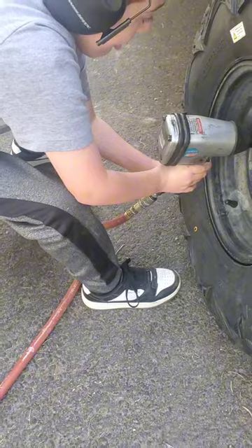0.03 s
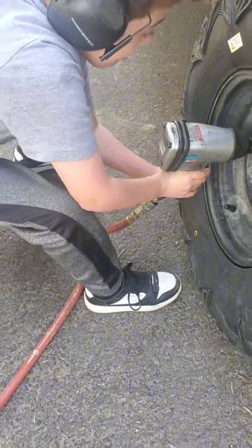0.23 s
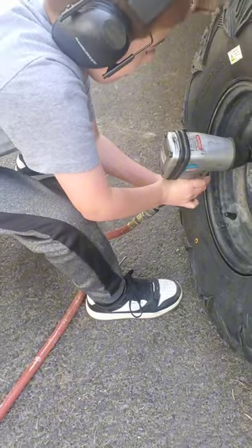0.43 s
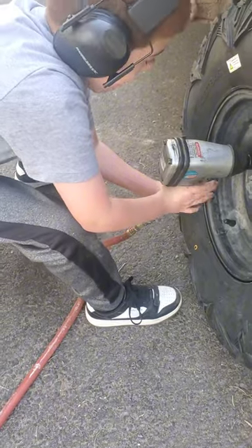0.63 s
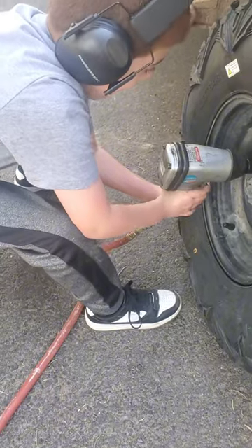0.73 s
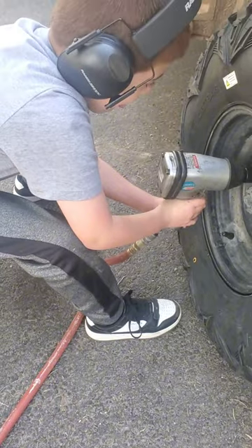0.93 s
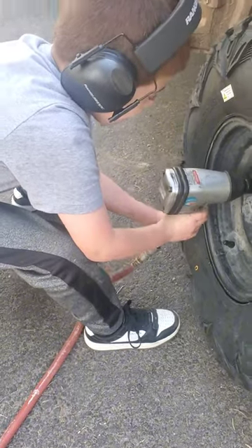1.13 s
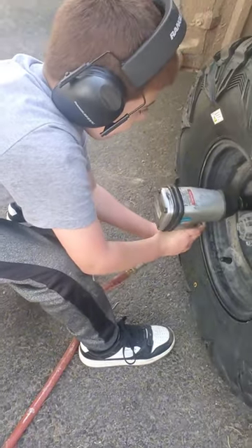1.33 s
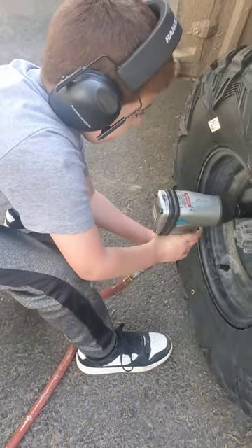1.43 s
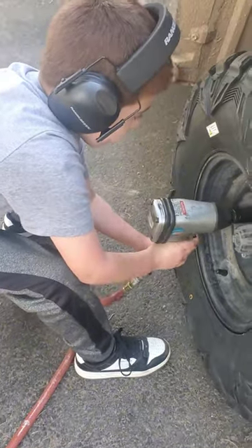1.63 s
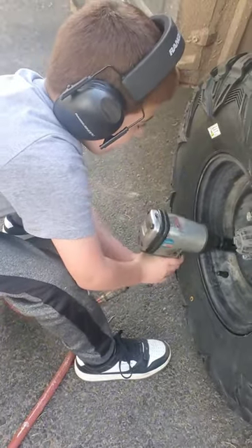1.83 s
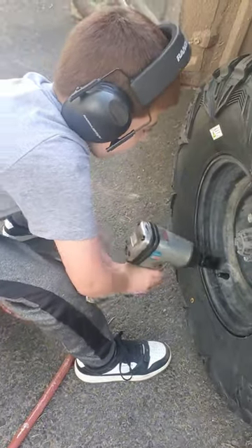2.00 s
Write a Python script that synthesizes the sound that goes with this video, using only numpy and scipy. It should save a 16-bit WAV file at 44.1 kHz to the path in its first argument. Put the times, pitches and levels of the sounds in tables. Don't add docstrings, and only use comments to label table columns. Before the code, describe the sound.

An air impact wrench fires one short rattling burst on a wheel nut, then clicks off

```python
import sys
import numpy as np
from scipy import signal
from scipy.fft import rfft, irfft, next_fast_len
from scipy.io import wavfile
from scipy.ndimage import uniform_filter1d, map_coordinates

SR = 44100
rng = np.random.default_rng(int(sys.argv[2]) if len(sys.argv) > 2 else 0)


def natural_amplitude(level_db):
    exponent = np.asarray(level_db, float) / 20
    return 10 ** exponent


def store_pcm(level_fs):
    pcm = np.round(np.clip(level_fs, -1, 1) * 32767).astype(np.int16)
    wavfile.write(sys.argv[1], SR, np.atleast_2d(pcm).T)


N = 90978
T = np.arange(N) / SR
STRIKE_T = np.arange(SR // 5) / SR


def unit(x):
    return x / np.sqrt(np.mean(x ** 2) + 1e-20)


def along(points, hz):
    f, v = np.transpose(points)
    return np.interp(np.log(hz + 1), np.log(f + 1), v)


def curves(rows):
    s, *cols = np.transpose(rows)
    return [np.interp(T, s, c) for c in cols]


def wobble(rate):
    return map_coordinates(rng.standard_normal(2000), [T * rate])


def filtered(x, response):
    m = next_fast_len(N + SR // 2)
    return irfft(rfft(x, m) * response(np.fft.rfftfreq(m, 1 / SR)), m)[..., :N]


def low_cut(x, corner_hz):
    return filtered(x, lambda f: (1j * f / (corner_hz + 1j * f)) ** 2)


def shape(table):
    return lambda f: natural_amplitude(along(table, f))


def peak(f, center_hz, width_hz):
    return 1 / (1 + (2 * (f - center_hz) / width_hz) ** 2)


def bump(start_s, half_s):
    return np.exp(-.5 * ((T - start_s) / half_s) ** 2)


def window(start, end, rise, fall):
    return (1 + np.tanh((T - start) / rise)) * (1 + np.tanh((end - T) / fall)) / 4


def rush(colour, alike, patchy_db):
    z = signal.stft(rng.standard_normal((2, N)), nperseg=256)[2]
    field = uniform_filter1d(rng.standard_normal(z.shape[1:]), size=5, axis=0)
    field = uniform_filter1d(field, size=6, axis=1)
    pair = signal.istft(z * natural_amplitude(patchy_db * unit(field)), nperseg=256)[1][:, :N]

    def spread(hz):
        angle = np.arccos(np.clip(along(alike, hz), -1, 1)) / 2
        return np.array([np.cos(angle), np.sin(angle)])

    mid, side = filtered(pair, spread)
    return unit(filtered(np.array([mid + side, mid - side]), colour))


def blips(rows, half_s):
    out = np.zeros((2, N))
    for s, db, hz in rows:
        phase = 2 * np.pi * rng.random()
        apart = (rng.random() - .5) * np.array([[1], [-1]])
        out += natural_amplitude(db) * bump(s, half_s) * np.sin(2 * np.pi * hz * T + phase + apart)
    return out


def place(out, start_s, sound):
    out[:, round(start_s * SR):][:, :len(STRIKE_T)] += sound


# start_s, vane_rate_hz, air_flow_db
SPEED = [
    (1.03, 201, -27.5),
    (1.075, 288, -24),
    (1.103, 305, -17.5),
    (1.13, 395, -17.5),
    (1.167, 466, -16),
    (1.19, 402, -16.5),
    (1.225, 370, -17),
    (1.26, 386, -17),
    (1.34, 378, -18),
]


def wrench():
    rate_hz, flow_db = curves(SPEED)
    turns = np.cumsum(rate_hz * (1 + .022 * wobble(rate=110))) / SR
    flow = natural_amplitude(flow_db) * window(1.026, 1.3305, .004, .004)
    singing = np.sqrt(2) * vane_tones(rate_hz, turns) * window(1.068, 1.327, .008, 0.033)
    rattle_db = -17.5 + 5 * window(1.17, 3, .03, 0.6)
    return exhaust(turns, flow) + flow * (singing + natural_amplitude(rattle_db) * rattle())


# start_s, level_db, half_width_s
PUFFS = [
    (1.002, -48, 0.0026),
    (1.009, -30.5, 0.0016),
    (1.017, -15, 0.0047),
    (1.021, -17.5, 0.0029),
    (1.04, -14.5, 0.0018),
    (1.05, -24, .002),
    (1.056, -29, 0.0022),
    (1.065, -17, 0.002),
    (1.078, -27.5, 0.0029),
    (1.089, -22, 0.0025),
]
# pitch_hz, level_db (per Hz)
JET = [(150, -18.5), (500, -11.5), (2500, -15.5), (5000, -10.5), (8200, -12.5), (11000, -9.5),
       (15500, -10.5), (16100, -47)]
# pitch_hz, width_hz, level_db
PORTS = [(1980, 200, -0.5), (2600, 180, -3.5), (3500, 480, -2), (4560, 250, -9.5), (5980, 1000, 1.5),
         (11700, 250, 1), (12300, 230, -2.5), (13100, 770, -3.5)]
# pitch_hz, likeness (0 to 1)
ALIKE = [(60, 0.61), (180, 0.9), (550, 1), (1650, 1), (4970, 0.77), (15000, 0.1)]


def exhaust(turns, flow):
    def ports(f):
        ringing = sum(natural_amplitude(db) * peak(f, center, width) for center, width, db in PORTS)
        return natural_amplitude(along(JET, f)) * (1 + natural_amplitude(2) * ringing)

    def bright(f):
        valve_seat = 1 + natural_amplitude(-1.5) * peak(f, 2300, 1100)
        return ports(f) * natural_amplitude(7.5 * np.log10(f + 1)) * valve_seat

    pops = sum(natural_amplitude(db) * bump(s, half_s) for s, db, half_s in PUFFS)
    chop = (1 + .33 * np.cos(2 * np.pi * turns)) * natural_amplitude(.6 * wobble(60))
    return rush(ports, ALIKE, 1.5) * flow * chop + rush(bright, ALIKE, 1.5) * pops


# multiple (of the rate), level_db (over the air flow)
VANES = [(1, -14), (2, -16.5), (2.5, -30.5), (3, -34.5), (3.5, -26.5), (5, -26)]
# pitch_hz, level_db
PIPE = [(250, -31.5), (305, -14), (335, -1), (400, 0), (470, 1), (600, 1), (1000, -2), (2500, 0)]
VANE_COUNT, VANE_WOBBLES_PER_S = 6, 70


def vane_tones(rate_hz, turns):
    out = 0
    for k, db in VANES:
        level = natural_amplitude(db + along(PIPE, k * rate_hz) + 1.8 * wobble(rate=VANE_WOBBLES_PER_S))
        rough = 1 + .35 * wobble(rate=4 * VANE_WOBBLES_PER_S)
        uneven = 1 + .75 * (k > 1) * np.cos(2 * np.pi * turns / VANE_COUNT)
        out = out + level * rough * uneven * np.sin(2 * np.pi * k * turns)
    return out


def rattle():
    hits_per_s, ring_hz = 600, 2200
    chance, size = rng.random((2, N))
    strength = natural_amplitude(-3.5 * np.log(size + .03))
    hits = (chance < hits_per_s / SR) * strength * np.sign(chance * SR / hits_per_s - .5)

    def ring(f):
        return (1j * f * ring_hz * .6 / (ring_hz ** 2 - f * f + 1j * f * ring_hz * 0.96)) ** 2

    steel = unit(filtered(hits, ring))
    return steel + .5 * np.roll(steel, 9) * [[1], [-1]]


# start_s, level_db,
# pitch_hz
KNOCKS = [(1.012, -18.5, 2002), (1.017, -19.5, 2500), (1.023, -17.5, 2000), (1.106, -12, 11300),
          (1.152, -11.5, 12200), (1.157, -10.5, 12300), (1.187, -12.5, 12200), (1.089, -17, 2700),
          (1.098, -20, 2600), (1.11, -17.5, 1800), (1.112, -17, 2630), (1.152, -22.5, 2440),
          (1.181, -15, 1870), (1.202, -13.5, 3054), (1.209, -12.5, 1800), (1.21, -16.5, 2674),
          (1.228, -13, 1845), (1.229, -18, 1281), (1.245, -18.5, 1910), (1.289, -21.5, 2600),
          (1.299, -13.5, 1984), (1.308, -15.5, 2483), (1.324, -16, 2640), (1.288, -20, 4897),
          (1.297, -17, 4680), (1.253, -20, 4700), (1.329, -17, 4900)]
# start_s, level_db
CHIRPS = [(1.093, -17), (1.106, -17.5), (1.13, -17), (1.146, -17), (1.152, -16), (1.16, -16), (1.167, -15),
          (1.172, -10), (1.179, -10), (1.188, -14), (1.206, -14.5), (1.219, -17.5), (1.244, -17.5),
          (1.253, -18), (1.266, -16), (1.272, -17), (1.276, -14), (1.283, -13.5), (1.288, -11.5)]


def slaps():
    whistles = [(s, db, 6040 * rng.normal(1, .04)) for s, db in CHIRPS]
    return natural_amplitude(-1.5) * (blips(KNOCKS, half_s=.0011) + blips(whistles, half_s=0.00068))


DETUNE = .012


def modes(table):
    out = 0
    for hz, db, t60 in table:
        chatter_db = 3 * wobble(rate=200)[:len(STRIKE_T)]
        level = natural_amplitude(db + rng.normal(0, 1.5) + chatter_db - 60 * STRIKE_T / t60)
        out = out + level * np.sin(2 * np.pi * hz * rng.normal(1, DETUNE) * STRIKE_T)
    return out


# pitch_hz, level_db, t60_s
RIM = [(488, 7.5, .022), (747, 0.5, 0.051)]


def strike(db, ring_db, crack_db, rim_db, steel, blow_hz):
    t = STRIKE_T
    rim = natural_amplitude(rim_db + 10.5) * modes(RIM) * (1 - np.exp(-t / 0.0029)) ** 2
    ring = natural_amplitude(ring_db) * modes(steel) / 2 + rim
    blow = natural_amplitude(11.5 - 60 * t / 0.0091) * np.sin(2 * np.pi * blow_hz * rng.normal(1, DETUNE) * t)
    noise = rng.standard_normal(len(t)) + 0.23 * rng.standard_normal((2, len(t)))
    hiss = signal.lfilter([.5], [1, -1.1, .4], noise)
    fade = natural_amplitude(-60 * t / 0.023) + natural_amplitude(-27 - 60 * t / .3)
    crack = natural_amplitude(crack_db) * fade * np.diff(hiss, prepend=0)
    return natural_amplitude(db - 5) * (ring + blow + 2 * crack) * (1 - np.exp(-t / .0007))


# start_s, peak_db, ring_db, crack_db, rim_db
SNAP = (1.358, -20, 7, -1, -40)
# pitch_hz, level_db, t60_s
TRIGGER = [(446, 0, 0.071), (750, -8, 0.065), (1154, -6, .025), (1797, -4, 0.049), (2180, 6.5, .015),
           (3040, -7, 0.022), (3580, 0, 0.028), (4540, -5, 0.013), (6780, -18, .03)]
# start_s, peak_db, ring_db, crack_db, rim_db
CLICKS = [
    (1.9146, -34, 9, -11, -7),
    (2.0089, -16.5, 6.5, -16.5, -18.5),
    (2.0479, -27, 10, -17, -13.5),
]
# pitch_hz, level_db, t60_s
SOCKET = [(1180, -12, .03), (1960, 0, .016), (2540, -10, .035), (2760, -6, .022), (3225, -18, .035),
          (4100, -13, .026), (4550, -18, .03), (5250, -13, .022), (5800, -9, .022), (6891, -22, .05),
          (7569, -23, .03), (9400, -34, .05)]
# start_s, level_db, pitch_hz
TICKS = [(.003, -50, 4000), (.04, -56, 8800), (.087, -49, 5000), (.402, -57, 5000), (.68, -53, 2300),
         (.693, -54, 12000), (.845, -45, 2300), (1.833, -53, 2600), (1.832, -51, 1600), (1.84, -55, 800),
         (1.844, -53, 1700)]


def socket():
    out = np.zeros((2, N + SR))
    start_s, *levels = SNAP
    place(out, start_s, strike(*levels, TRIGGER, blow_hz=3100))
    for start_s, *levels in CLICKS:
        place(out, start_s, strike(*levels, SOCKET, blow_hz=2567))
    for start_s, db, hz in TICKS:
        band = signal.butter(2, [hz * .85, hz * 1.17], "band", fs=SR)
        grit = signal.lfilter(*band, rng.standard_normal((2, len(STRIKE_T))))
        place(out, start_s, natural_amplitude(db - 60 * STRIKE_T / 0.033) * grit)
    return low_cut(out[:, :N], 332.7)


# start_s, level_db, pitch_hz, t60_s
THUMPS = [
    (0.0, -37, 69, 0.12),
    (0.047, -44, 51.3, 0.16),
    (0.139, -50.5, 52.5, 0.31),
    (1.018, -34.5, 94.8, 0.13),
    (1.029, -36, 165, 0.18),
    (1.342, -35, 176.5, 0.17),
    (1.91, -62.5, 99, 0.34),
]


def thump():
    out = 0
    for s, db, hz, t60 in THUMPS:
        since = np.maximum(T - s, 0)
        out = out + natural_amplitude(db - 60 * since / t60) * np.sin(2 * np.pi * hz * since)
    return out


def echo(x, t60s):
    hz, t, z = signal.stft(rng.standard_normal((2, SR // 2)), SR, nperseg=128)
    side = z[1] * (hz / np.hypot(hz, 1800))[:, None]
    z = z[0] + side * [[[1]], [[-1]]]
    tail = signal.istft(z * natural_amplitude(-60 * t / along(t60s, hz)[:, None]), SR, nperseg=128)[1]
    return signal.fftconvolve(x, tail / np.linalg.norm(tail[0]), axes=1)[:, :N]


# start_s, level_db
GAIN = [(0, -56.5), (.1, -62), (.4, -60), (.43, -69), (.47, -61), (1.0, -58.5), (1.38, -42.5), (1.5, -74.5),
        (1.66, -79), (1.88, -76.5), (1.95, -66), (2.06, -60.5)]
# pitch_hz, level_db (per Hz)
MURMUR = [(59, -38), (100, -14.5), (315, -7), (818, -6.5), (1760, -18), (3400, -27.5), (7940, -45.5),
          (11900, -35.5), (16000, -49.5)]


def murmur():
    level_db, = curves(GAIN)
    alike = [(200, 1.0), (1000, 0.17), (8000, 0.093)]
    return natural_amplitude(level_db + 0.4 * wobble(5.6)) * rush(shape(MURMUR), alike, patchy_db=2.0)


# start_s, end_s, pitch_hz, level_db
HUMS = [(0.062, 0.36, 1155, -63.5), (0.44, 0.664, 1158, -68), (0.457, 0.793, 820, -63.5),
        (0.71, 0.87, 1795, -76.5), (0.8, 1.02, 1154, -68), (0.83, 1.015, 900, -69), (0, 0.088, 569, -63),
        (1.514, 1.73, 1153, -77), (1.444, 1.647, 247.6, -71.5), (1.6, 1.9, 94, -73.5),
        (1.3, 1.526, 970, -70), (0.95, 1.473, 1600, -80), (1.42, 1.545, 540, -91), (1.61, 1.634, 280, -71)]


def hums():
    out = 0
    for start, end, hz, db in HUMS:
        level = natural_amplitude(db + 2 * wobble(rate=12)) * window(start, end, .025, .025)
        out = out + level * np.sin(2 * np.pi * hz * T)
    return np.sqrt(2) * out


# pitch_hz, level_db (per Hz)
LEAK = [(1470, -1), (2500, -6), (4760, -3), (5350, -5), (6550, -4), (7590, -14.5), (13900, -10),
        (16000, -16.5)]


def leak():
    level_db = -60 - 22.5 * T + 1.2 * wobble(14)
    return natural_amplitude(level_db) * window(-1.3, 0.55, 0.94, 0.085) * rush(shape(LEAK), [(4000, 0.12)], 1)


# start_s, level_db
WIND = [(0, -42), (.08, -59.5), (.12, -74), (.15, -65.5), (.22, -71), (.39, -60), (.43, -80), (.62, -64.5),
        (.71, -72.5), (.8, -66), (.87, -75), (.97, -65), (1.05, -54.5), (1.38, -51.5), (1.47, -54.5),
        (1.63, -72), (1.95, -77.5), (2.06, -58.5)]
# pitch_hz, level_db (per Hz)
RUMBLE = [(12, -30), (20, -22), (54, 2.5), (110, -5), (230, -16), (400, -24), (520, -22.5), (880, -120)]


def wind():
    def turned(f):
        angle = .85 / (1 + (f / 110) ** 4)
        return natural_amplitude(along(RUMBLE, f)) * np.exp(1j * angle * [[1], [-1]])

    level_db, = curves(WIND)
    gusts = natural_amplitude(level_db + 1.5 * wobble(22) + [[4.5], [1.5]])
    return gusts * rush(turned, [(60, .9)], 0.86)


def yard():
    return murmur() + hums() + leak() + wind()


# pitch_hz, t60_s
YARD = [(230, .9), (450, 0.26), (1500, 0.29), (4000, .33), (12000, 0.23)]
# pitch_hz, left_minus_right_db
LEAN = [(60, 0.5), (240, 2.5), (950, 2), (3770, 2.5), (15000, 0)]


def scene():
    tool = low_cut(wrench() + slaps() + socket(), 120) + thump()
    near = natural_amplitude(-5.5) * echo(tool, [(1000, .07)])
    far = natural_amplitude(-22) * echo(tool, YARD)
    lean = lambda f: natural_amplitude(along(LEAN, f) * [[.5], [-.5]])
    return filtered(tool + near + far, lean) + yard()


def roll_off(x):
    return signal.sosfilt(signal.butter(12, 16610, fs=SR, output="sos"), x)


def record(dry):
    soft = dry / (1 + np.abs(dry / .9) ** 4) ** (1 / 4)
    mix = filtered(soft, lambda hz: hz < 16400)
    return roll_off(mix)


dry = scene()
out = record(dry)
store_pcm(out)
```